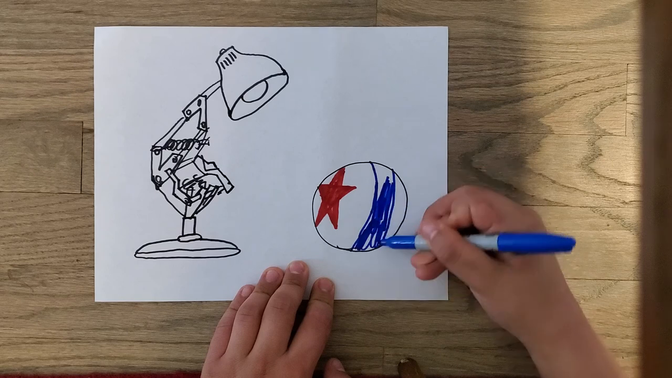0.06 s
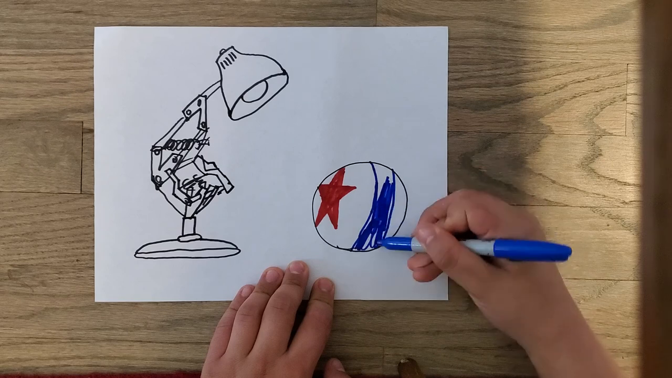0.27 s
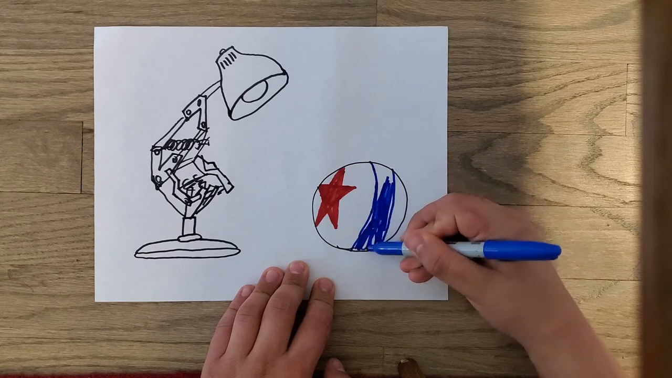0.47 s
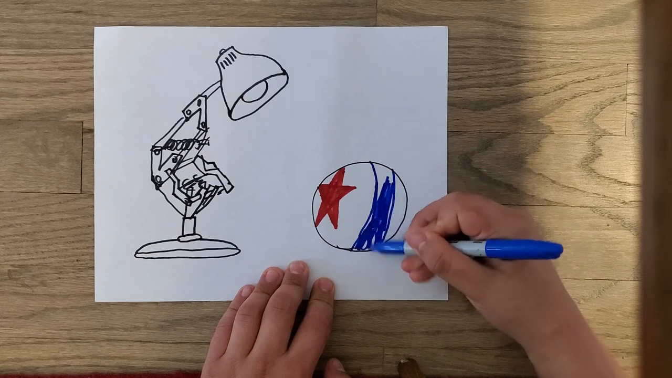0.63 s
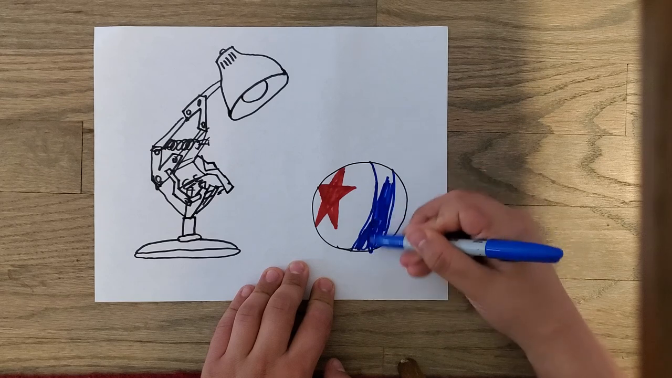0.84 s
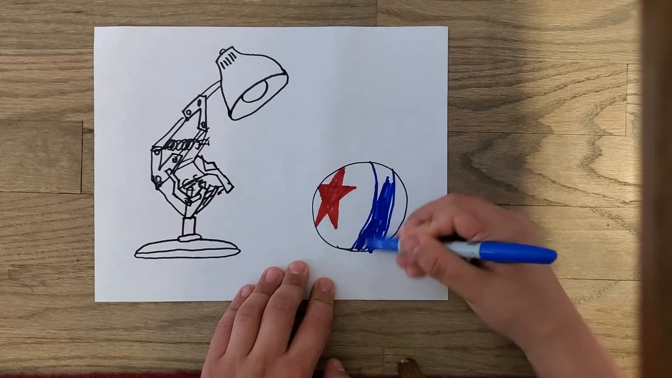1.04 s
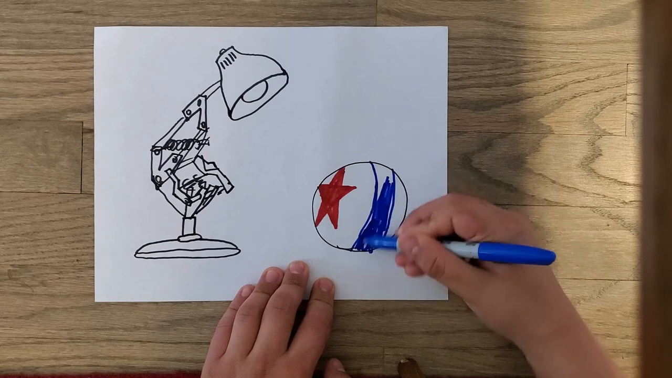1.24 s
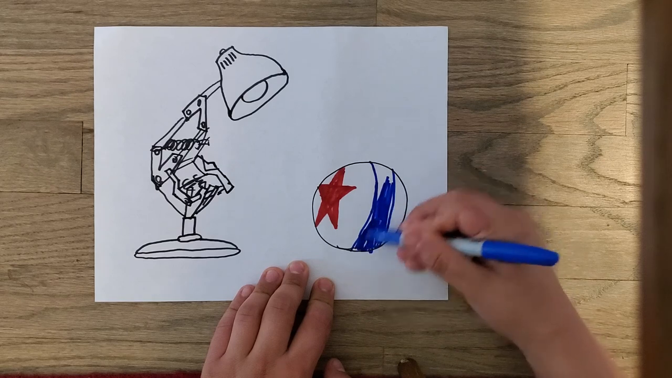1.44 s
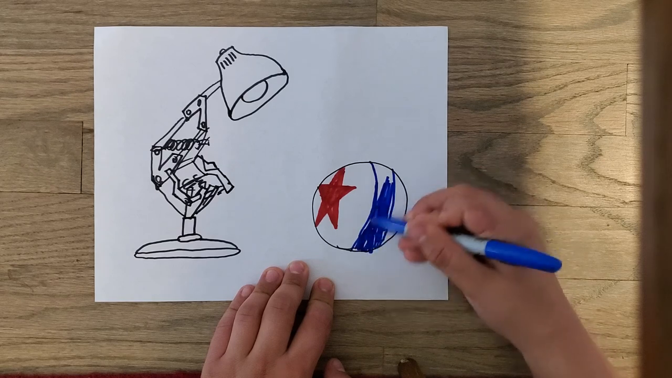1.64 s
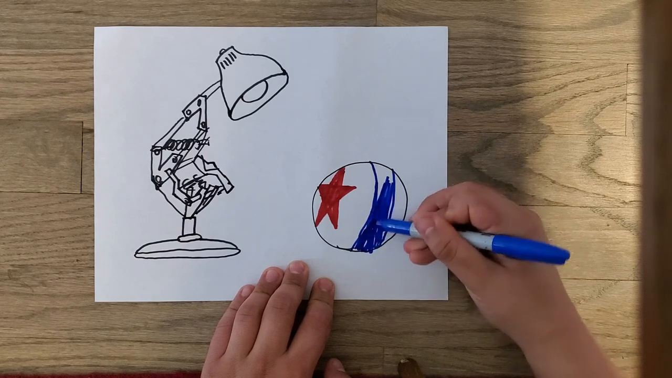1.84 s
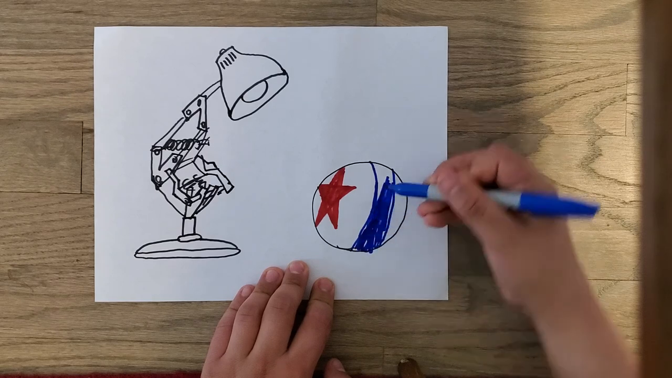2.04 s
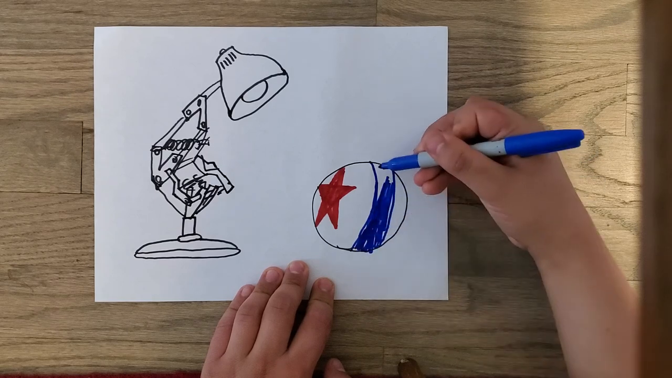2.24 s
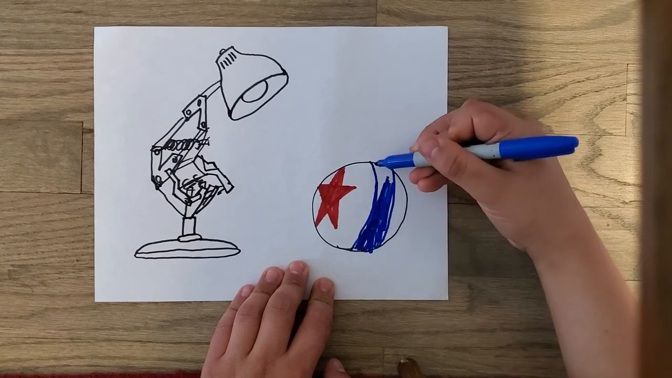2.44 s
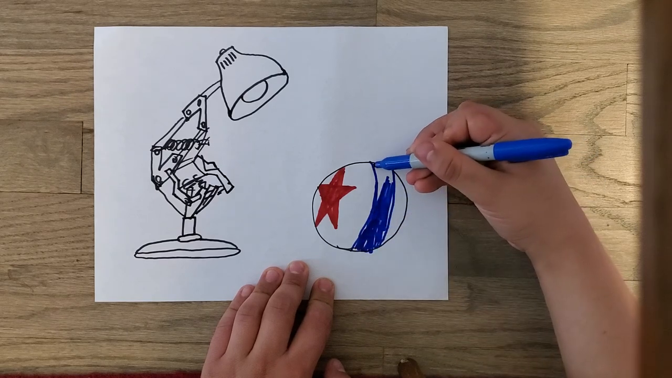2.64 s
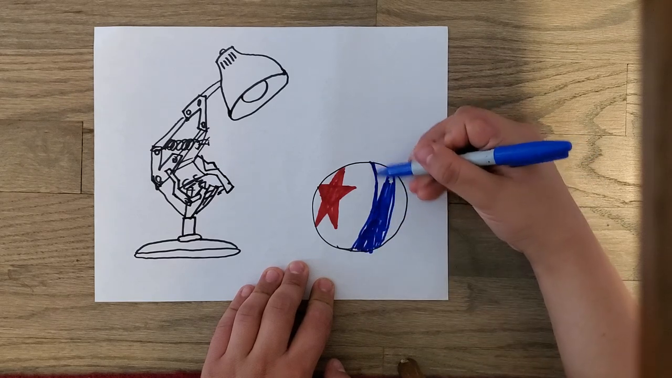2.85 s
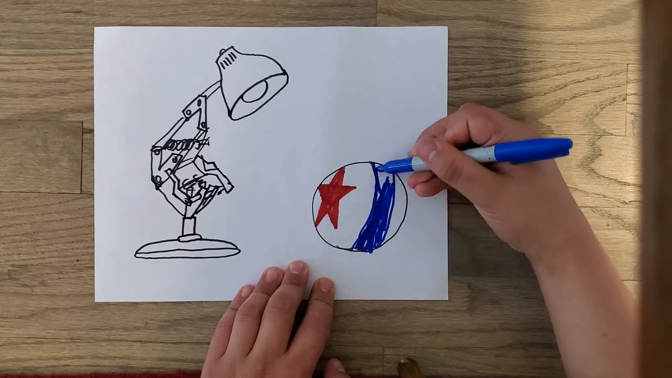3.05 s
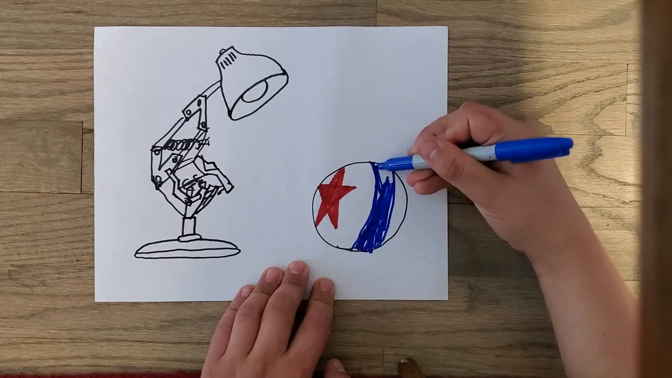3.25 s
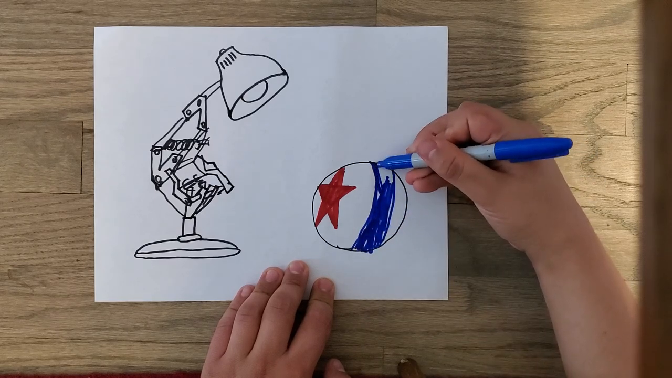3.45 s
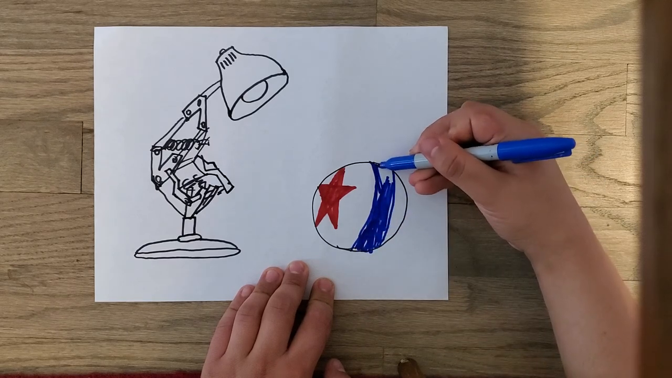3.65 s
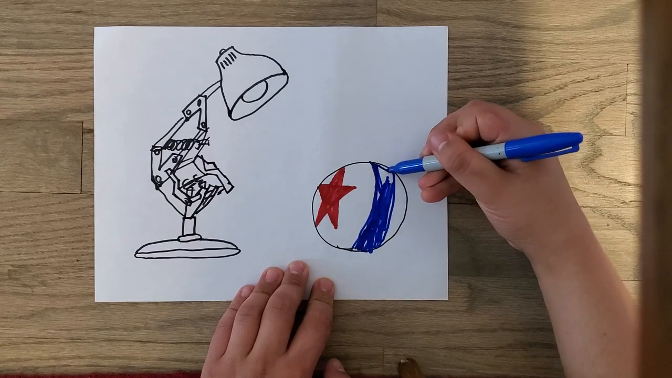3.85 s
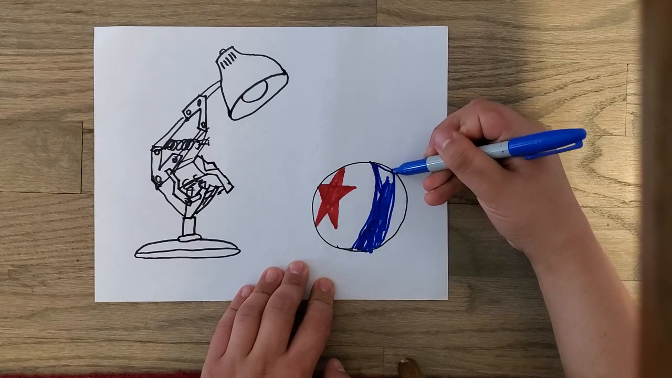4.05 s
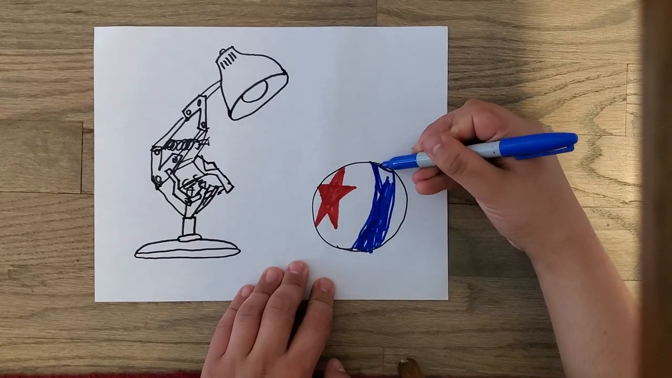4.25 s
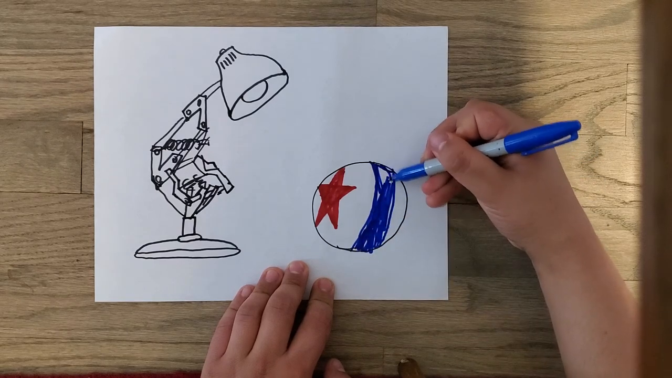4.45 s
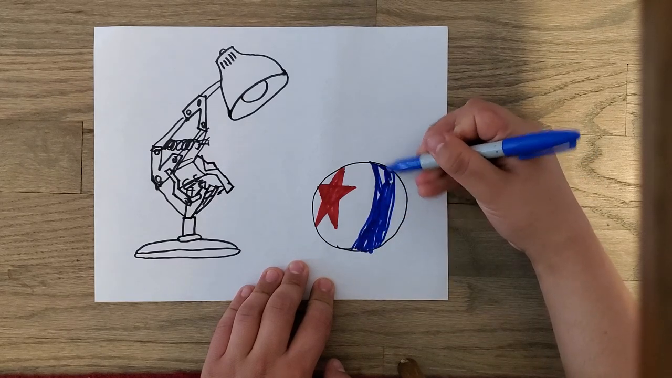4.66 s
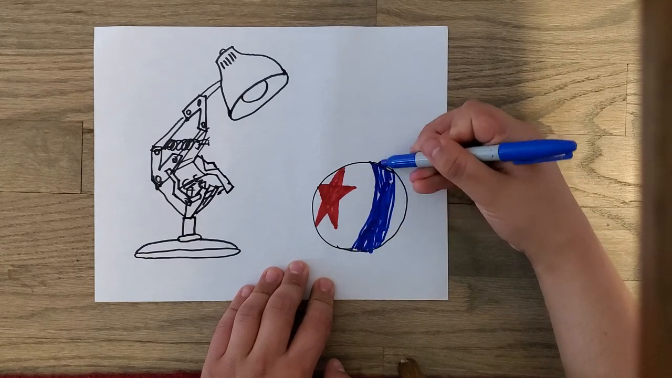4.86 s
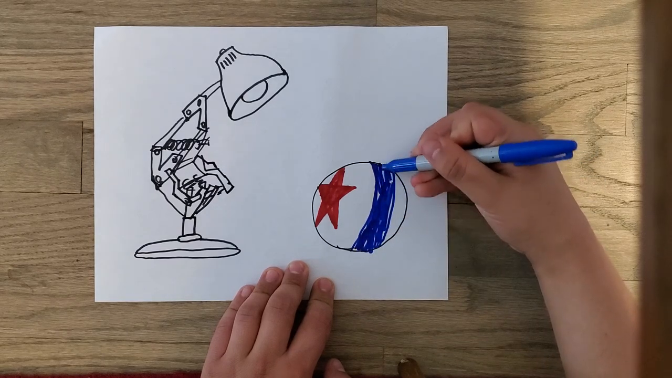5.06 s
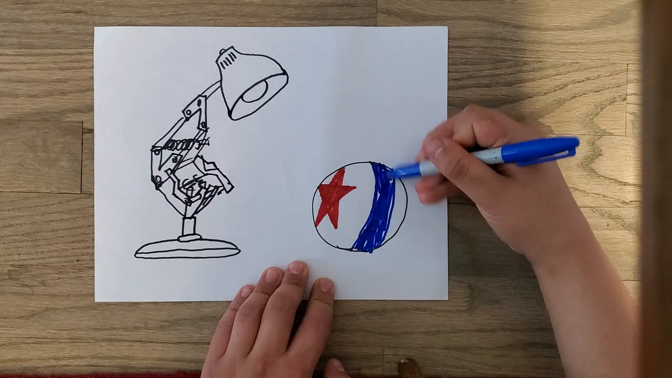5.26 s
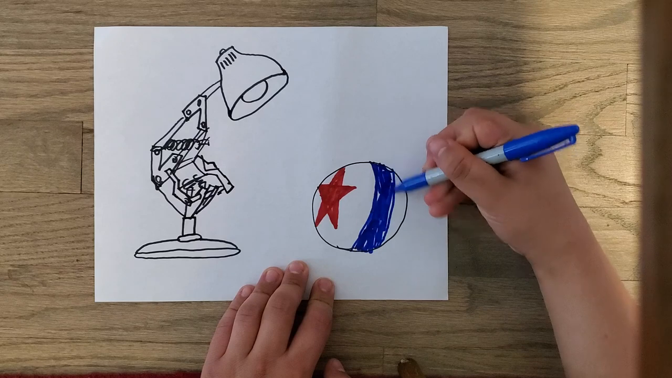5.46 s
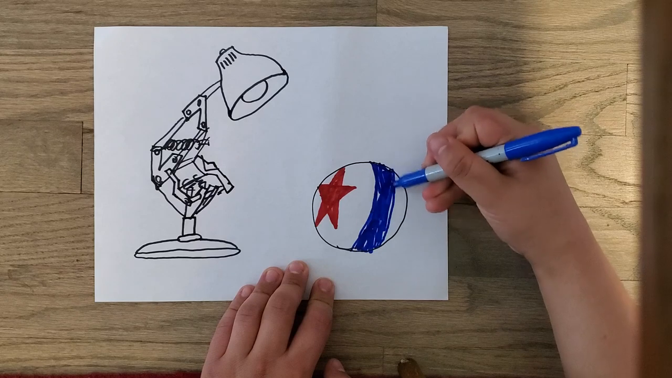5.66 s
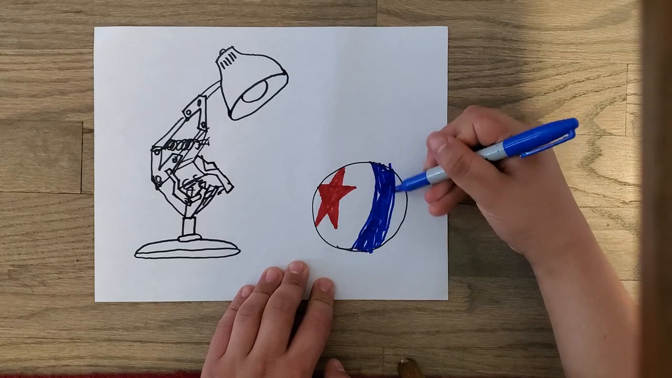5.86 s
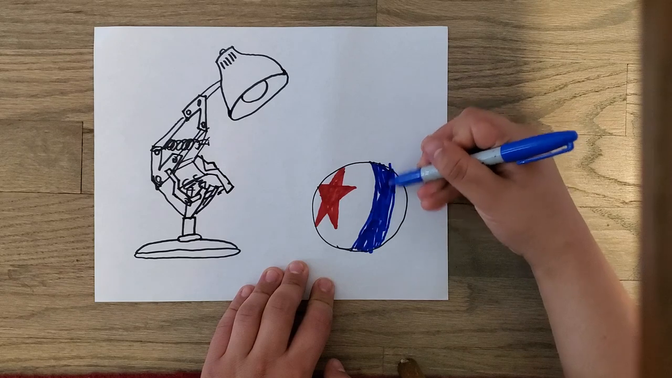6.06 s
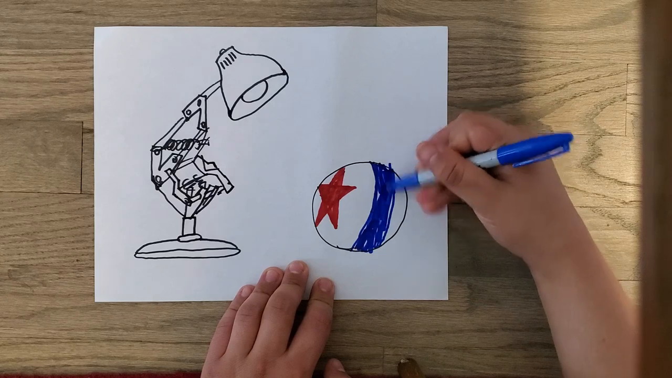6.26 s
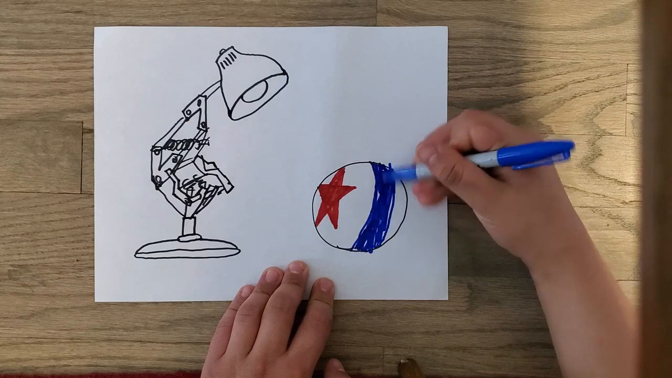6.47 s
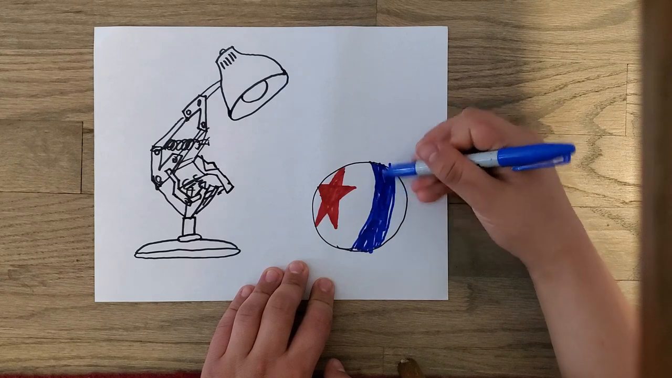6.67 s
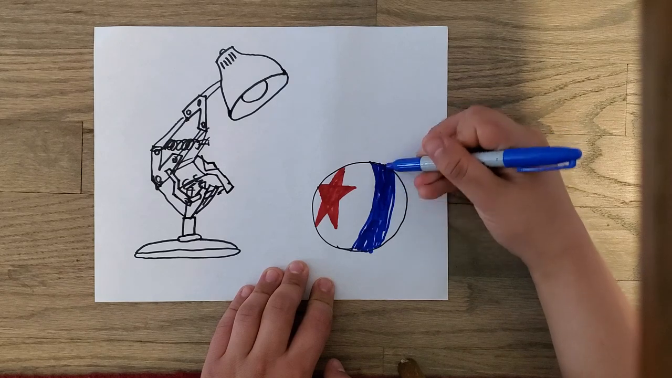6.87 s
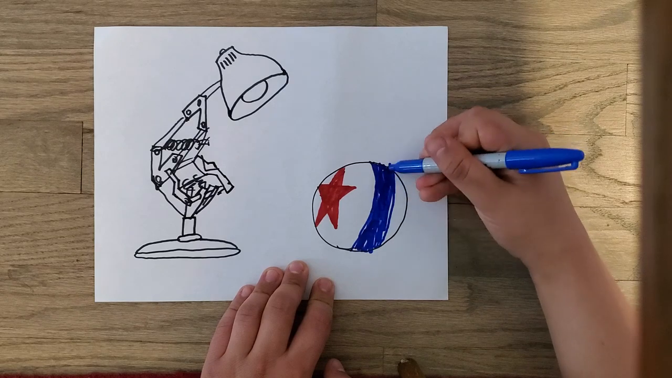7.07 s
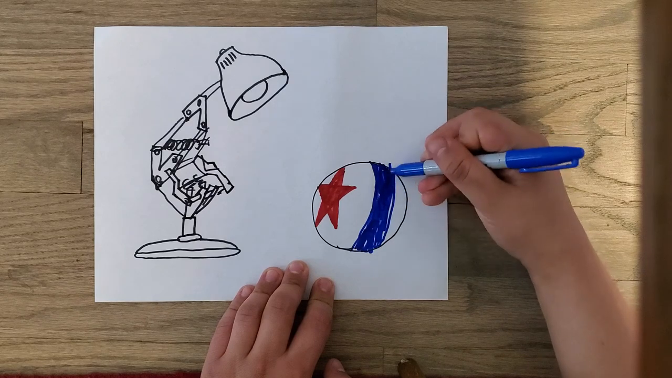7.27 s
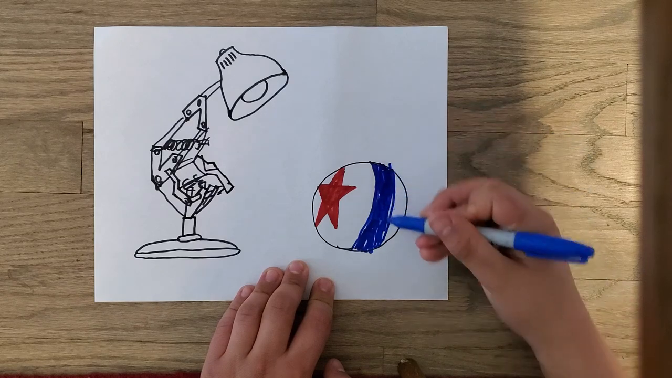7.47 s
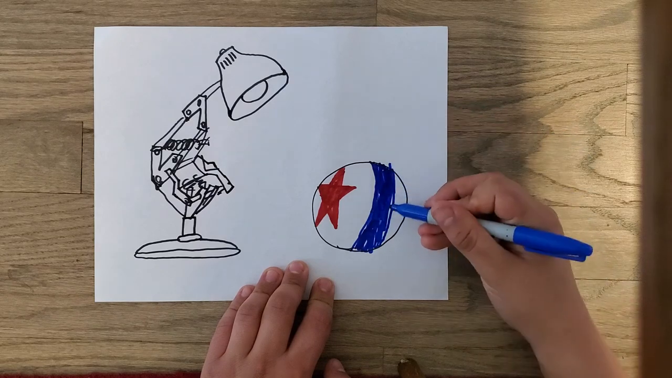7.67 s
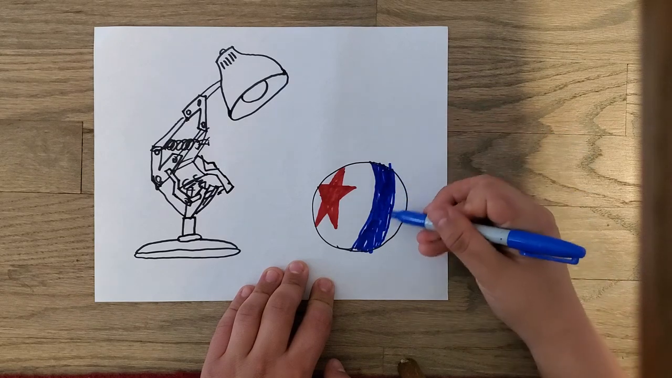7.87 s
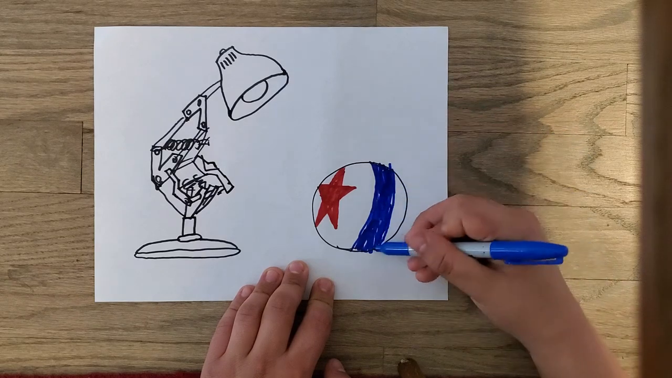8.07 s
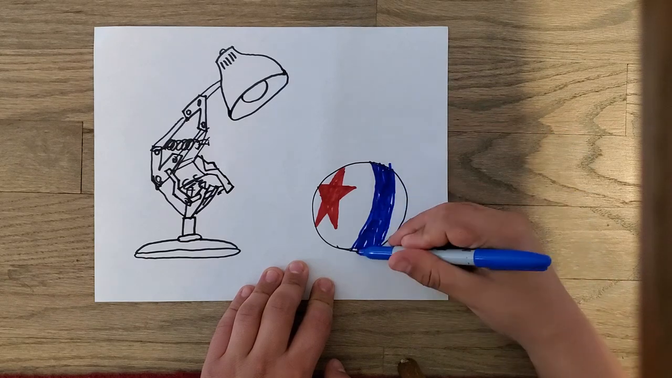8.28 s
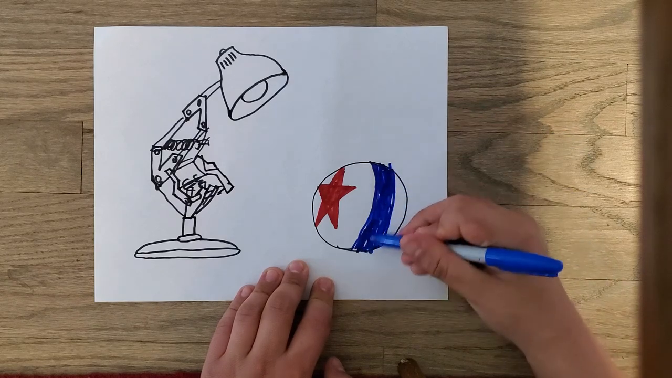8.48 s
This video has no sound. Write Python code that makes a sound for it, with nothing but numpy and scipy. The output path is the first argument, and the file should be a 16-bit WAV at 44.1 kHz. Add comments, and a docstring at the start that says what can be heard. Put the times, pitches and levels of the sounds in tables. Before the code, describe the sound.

A felt-tip marker scribbles quickly back and forth on paper, with short pauses, over a low indoor hum.

```python
"""In a small room, a felt-tip marker colours in a drawing on paper on wood, about ten strokes a second.
Sliding friction plucks the paper's fibres into a rasp and a hiss, close to the left microphone;
the right one hears mostly reverberation. The tip or the hand slides lightly, the wood rumbles,
the pen ticks on impact, its cap rings thinly, and stick-slip motion makes the felt squeak once.
Behind it all an appliance hums at twice the mains frequency."""
import sys
import numpy as np
from scipy import signal
from scipy.fft import rfft, irfft, next_fast_len
from scipy.io import wavfile
from scipy.ndimage import uniform_filter1d, map_coordinates

SR = 44100
rng = np.random.default_rng(int(sys.argv[2]) if len(sys.argv) > 2 else 0)


def log_audio(samples):
    """Write samples as a 16-bit WAV file to the path given in sys.argv[1]."""
    # one column per channel
    frames = np.atleast_2d(samples).T
    # limit to full scale, then quantise
    limited = np.clip(frames, -1, 1)
    pcm = np.round(limited * 32767).astype(np.int16)
    wavfile.write(sys.argv[1], SR, pcm)


N = 375291

# Tip friction on the far part of the drawing. Each row: frequency in Hz, relative density in dB.
FAR_TIP_SPECTRUM = [(300, -35), (1250, -27.5), (1750, -15), (2100, -20.5), (2600, -17.5), (3200, -11.5),
                    (3900, -17.5), (5600, -4.5), (6700, -5.5), (7400, -9.5), (8200, -4), (11300, 2.5),
                    (14000, 1), (15600, 0.5)]


def marker(speed, hiss_gain, rasp_gain, split_hz=7500):
    """Sliding friction: a faster tip plucks more fibres a second, giving a low rasp and a high hiss."""
    # Tip friction on the near part. Each row: frequency in Hz, relative density in dB.
    near_tip_spectrum = [(300, -27.5), (800, -29.5), (1150, -37.5), (1450, -20.5), (2050, -12.5),
                         (3000, -11), (4200, -13), (5400, -2.5), (6700, -3.5), (7500, -6), (10500, -3),
                         (13000, -2), (14400, -3.5), (15700, -4)]
    friction = patchy(fibres(2000 + 5000 * speed, snap_share=0.34, uneven_db=1.1), depth_db=2.5)
    sound = amp(-22 + 3.3 * wobble(14)) * rasp_gain * sheet(friction)
    far = on_far_part()
    for place, spectrum in ((~far, near_tip_spectrum), (far, FAR_TIP_SPECTRUM)):
        tip = coloured(friction, spectrum)
        rasp = filtered(tip, lambda hz: 1 / (1 + (hz / split_hz) ** 12))
        hiss = tip - rasp
        sound += place * (amp(0.65) * rasp_gain * unit(rasp) + amp(1.83) * hiss_gain * unit(hiss))
    return sound


def strokes(hiss_power=0.9, rasp_power=0.48, firm_db=-47.5):
    """Friction noise follows power laws: hiss grows faster with speed and firmness than rasp does."""
    # Each row: start in seconds, length in seconds, relative hiss level at top speed in dB.
    pen_strokes = [(-0.007, 0.084, -36.0), (0.094, 0.084, -35.5), (0.201, 0.092, -33.5),
                   (0.329, 0.049, -36.5), (0.378, 0.079, -40.5), (0.512, 0.071, -50), (0.614, 0.072, -46.5),
                   (0.7, 0.088, -42.0), (0.79, 0.105, -41.5), (0.918, 0.083, -43.5), (1.005, 0.087, -42.5),
                   (1.101, 0.103, -50.5), (1.209, 0.095, -46.5), (1.329, 0.09, -48), (1.425, 0.081, -43.5),
                   (1.507, 0.11, -43), (1.616, 0.091, -39.5), (1.719, 0.094, -42), (1.824, 0.075, -42),
                   (1.929, 0.082, -38.5), (2.031, 0.25, -64), (2.844, 0.12, -42.5), (2.987, 0.092, -40),
                   (3.1, 0.068, -40), (3.199, 0.075, -34.5), (3.297, 0.058, -49.0), (3.407, 0.066, -48),
                   (4.174, 0.044, -55), (4.338, 0.084, -46), (4.474, 0.052, -39), (4.533, 0.057, -40.5),
                   (4.63, 0.077, -37), (4.707, 0.072, -34), (4.802, 0.078, -35.0), (4.882, 0.088, -37.5),
                   (4.996, 0.066, -37), (5.079, 0.077, -39.0), (5.183, 0.066, -37.5), (5.259, 0.065, -42.0),
                   (5.35, 0.048, -46.5), (5.427, 0.064, -41.5), (5.505, 0.094, -38.5), (5.594, 0.086, -43),
                   (5.716, 0.085, -41.5), (5.798, 0.07, -37.0), (5.912, 0.064, -41), (5.989, 0.079, -44),
                   (6.097, 0.071, -38.5), (6.169, 0.088, -37.5), (6.275, 0.073, -38.5),
                   (6.352, 0.079, -36.5), (6.461, 0.063, -36.0), (6.54, 0.083, -35.5),
                   (6.648, 0.072, -36.5), (6.739, 0.07, -39), (6.829, 0.068, -35.0), (6.906, 0.075, -38.5),
                   (7.009, 0.074, -41.5), (7.11, 0.1, -42.0), (7.225, 0.083, -40.0), (7.391, 0.16, -67.5),
                   (7.871, 0.12, -42.5), (8.34, 0.11, -49), (8.459, 0.07, -43.5)]
    speed, hiss_gain, rasp_gain = np.zeros((3, N))
    for start, length, db in pen_strokes:
        on, pace = swing(start, length, top=0.61, bite=0.83)  # bite < 1: stuck felt lets go suddenly
        rasp_db = db - 6 - 0.51 * max(0, db - firm_db)
        speed[on] = pace
        hiss_gain[on] += amp(db) * pace ** hiss_power
        rasp_gain[on] += amp(rasp_db) * pace ** rasp_power
    return speed, hiss_gain, rasp_gain


def fibres(per_second, snap_share, uneven_db):
    """Shot noise: single fibres snap over a smooth rub, clumped by the paper's tooth."""
    chance = per_second / SR
    snaps = (rng.random(N) < chance) * rng.standard_normal(N) / np.sqrt(chance)
    rub = np.sqrt(snap_share) * snaps + np.sqrt(1 - snap_share) * rng.standard_normal(N)
    return unit(rub * amp(uneven_db * wobble(500)))


def sheet(friction):
    """Forced vibration: friction drives the damped modes of the paper on the wood."""
    # Each row: resonance frequency in Hz, bandwidth in Hz, relative level in dB.
    modes = [(335, 53, 4), (467, 60, -4), (780, 143, -2)]

    def response(f):
        return sum((-1) ** k * amp(db) * 1j * f * width / (hz * hz - f * f + 1j * f * width)
                   for k, (hz, width, db) in enumerate(modes))
    return unit(filtered(friction, response))


def lean(x, weight, body_hz=1710):
    """Mechanical coupling: weight joins the tip more firmly to the wood; lows grow, the hiss stays."""
    return x + (weight - 1) * filtered(x, lambda hz: 1 / (1 + (hz / body_hz) ** 6))


def brushing():
    """Light friction: the tip or the hand slides slowly over the sheet; the hand's edge scuffs dully."""
    # Each row: start in seconds, length in seconds, level at top speed in dB.
    slides = [(3.625, 0.22, -66.5), (3.797, 0.21, -77), (4.103, 0.078, -60), (4.15, 0.08, -52.5),
              (4.314, 0.095, -58), (7.812, 0.059, -62), (7.887, 0.2, -53), (7.998, 0.1, -44.5),
              (8.098, 0.11, -54), (8.196, 0.06, -47.5), (8.331, 0.13, -53.5)]
    # Each row: centre in seconds, half length in seconds, level in dB.
    scuffs = [(2.024, 0.026, -66.5), (3.463, 0.055, -72.5), (4.215, 0.05, -70), (4.446, 0.046, -70),
              (4.543, .045, -67), (7.49, 0.12, -69.5), (8.021, 0.041, -70), (8.492, 0.063, -65)]
    # Slides on each part, and the hand's edge. Each row: frequency in Hz, relative density in dB.
    far_spectrum = [(300, -28), (780, -0.5), (1100, -2), (1350, -4.5), (1700, 0.5), (2800, -11.5),
                    (3250, -6.5), (4100, -16), (5100, 3.5), (5700, 7.5), (7400, -13), (8300, -1.5),
                    (11000, -10), (15500, -7.5)]
    near_spectrum = [(300, -15.5), (800, -13), (1200, -18.5), (1900, -9.5), (2700, -11.5), (4400, -16.5),
                     (5600, -3), (6600, 0), (7200, -11), (7800, -7), (8800, -12), (10700, -12),
                     (12000, -17), (15500, -13)]
    edge_spectrum = [(150, -14), (300, -1.5), (480, 2), (780, 0.5), (1200, -17), (2500, -21), (6000, -49.5)]
    slide_gain = np.zeros(N)
    for start, length, db in slides:
        on, pace = swing(start, length, top=0.6, bite=0.6)
        slide_gain[on] += amp(db) * pace ** 1.15
    rub = patchy(fibres(4000, snap_share=0.16, uneven_db=0), depth_db=0.5)
    sliding = np.where(on_far_part(), coloured(rub, far_spectrum), coloured(rub, near_spectrum))
    scuff_gain = sum(amp(db) * np.exp(-((clock() - s) / half) ** 2) for s, half, db in scuffs)
    edge = coloured(rng.standard_normal(N), edge_spectrum)
    return slide_gain * sliding + scuff_gain * edge


def contacts(tick_t60=0.016, tap_t60=0.083):
    """Impact excitation: the plastic barrel ticks in three damped modes; the felt lands with a tap."""
    # Each row: start in seconds, level in dB, lowest mode in Hz.
    barrel_ticks = [(2.028, -47.5, 1530), (6.258, -44, 2140), (7.38, -56, 1620), (7.745, -54.5, 2170)]
    # The felt lands or turns round. Each row: start in seconds, relative level in dB.
    landings = [(0.339, -32), (0.629, -50), (0.712, -38), (0.931, -40.5), (2.85, -44), (3.002, -34.5),
                (3.106, -38), (3.411, -36), (4.477, -32), (4.634, -48), (5.267, -34), (5.434, -43),
                (5.808, -30), (6.748, -35), (6.92, -31)]
    t = np.arange(SR // 10) / SR
    ticks, taps = np.zeros((2, N))
    for s, db, hz in barrel_ticks:
        ring = sum(size * np.sin(2 * np.pi * ratio * hz * t)
                   for ratio, size in ((1, 1), (1.38, -1), (1.75, .45)))
        add(ticks, s, amp(db - 60 * t / tick_t60) * ring * (1 - np.exp(-t / 0.00021)))
    for s, db in landings:
        add(taps, s, amp(db - 60 * t / tap_t60) * rng.standard_normal(len(t)))
    return ticks + filtered(taps, lambda hz: amp(along(FAR_TIP_SPECTRUM, hz)))


def squeak():
    """Stick-slip: the felt squeaks and breaks up into a scrape."""
    # Each row: time in seconds, pitch in Hz, phase scatter in radians.
    glide = [(8.3, 1110, 0.55), (8.35, 1127, 0.6), (8.41, 1132, 0.55), (8.449, 1157, 1.4), (8.51, 1167, 2)]
    times, *columns = np.transpose(glide)
    pitch, scatter = (np.interp(clock(), times, column) for column in columns)
    envelope = amp(-58.5) * flare(8.28, attack_s=0.026, fade_db_per_s=43)
    return envelope * rough_tone(pitch, drift=0.00606, scatter_rad=scatter)


def cap_ring():
    """Resonance: the pen's cap rings thinly in a pause."""
    envelope = amp(-76) * flare(7.44, attack_s=0.024, fade_db_per_s=126)
    return envelope * rough_tone(2150, drift=0.0076, scatter_rad=0.97)


def wood(effort, bump_hz=92, bump_t60=0.04, smoothing_s=0.14, rest_db=-56.5):
    """Structure-borne sound: the wood rumbles more as the hand draws harder and thuds as it settles."""
    # Each row: start in seconds, level in dB.
    bumps = [(2.718, -35), (2.842, -40), (4.723, -37), (7.482, -38)]
    # The woody rub and the deep rumble. Each row: frequency in Hz, relative density in dB.
    drag_spectrum = [(150, -12.5), (280, -1), (350, 1), (480, -1.5), (560, -6.5), (750, -17), (1200, -16),
                     (3000, -47)]
    rumble_spectrum = [(22, -17.5), (45, 1.5), (65, 6.5), (100, 0.5), (140, -3), (210, 0.5), (270, -9.5),
                       (400, -33.5), (800, -64.5)]
    t = np.arange(SR // 5) / SR
    thuds = np.zeros(N)
    for s, db in bumps:
        envelope = amp(db - 60 * t / bump_t60) * (1 - np.exp(-t / 0.0054))
        add(thuds, s, envelope * np.sin(2 * np.pi * bump_hz * t))
    # the hand moves more smoothly than the tip, and grips unevenly
    motion = np.abs(uniform_filter1d(effort, int(smoothing_s * SR))) + amp(rest_db)
    grip = unit(motion ** 0.72 * amp(2.5 * wobble(16)))
    drag = amp(-69.5) * grip * diffuse(drag_spectrum)
    rumble = amp(-62.5) * unit(grip ** 0.5) * diffuse(rumble_spectrum)
    return thuds + drag + rumble


def room(x, right_delay_s=0.000171):
    """Direct and reverberant fields: the first favours the left, the second shifts as the pen wanders."""
    # Direct path to the right microphone, and reflections. Each row: frequency in Hz, gain in dB.
    right_gain = [(400, -1), (1200, -5), (1700, -17), (3000, -36.5), (4000, -30), (6000, -15.5),
                  (11000, -24), (15000, -15.5)]
    reverb_gain = [(400, 1.5), (2000, -3.5), (4000, -0.5), (6000, -9.5), (10000, -8), (15000, -12)]
    spot = 1.85 * wobble(3)
    reflections = echo(x * np.cos(spot)) + echo(x * np.sin(spot))
    reverb = filtered(reflections, lambda f: amp(along(reverb_gain, f)))
    right = filtered(x, lambda f: amp(along(right_gain, f)) * np.exp(-2j * np.pi * f * right_delay_s))
    return np.array([x, right]) + reverb


def echo(x, early_db=-3, early_s=0.0037):
    """Convolution with a room response: early reflections, then a tail that dies faster in the treble."""
    # Each row: frequency in Hz, reverberation time in seconds.
    t60 = [(300, 0.48), (3000, 0.4), (8000, 0.44), (15000, 0.27)]
    hz, t, noise = signal.stft(rng.standard_normal((2, SR // 2)), SR, nperseg=256)
    decay = amp(-60 * t / along(t60, hz)[:, None]) + amp(early_db) * np.exp(-t / early_s)
    tail = signal.istft(noise * decay, SR, nperseg=256)[1]
    tail = np.pad(tail / np.linalg.norm(tail[0]), ((0, 0), (SR // 500, 0)))  # arrives 2 ms late
    return signal.fftconvolve(x[None], tail, axes=1)[:, :N]


def appliance(hum_hz=120):
    """Forced vibration at twice the mains frequency gives a wavering hum, joined by weak motor tones."""
    # Each row: time in seconds, rms level in dB.
    hum_levels = [(0.0, -54.5), (0.16, -52.5), (0.47, -52.5), (0.52, -62), (0.68, -55), (1.21, -54),
                  (2.58, -61), (3.1, -53), (3.62, -60.5), (4.83, -56), (5.37, -57.5), (5.44, -55.5),
                  (6.49, -56.5), (6.96, -52.5), (7.6, -58), (7.98, -50.5), (8.21, -57), (8.5, -52.5)]
    # Each row: frequency in Hz, rms level in dB.
    motor_tones = [(37.5, -78), (240, -74), (261.3, -76.5), (287.5, -75)]
    t = clock()
    hum_db = np.interp(t, *np.transpose(hum_levels)) + 0.06 * wobble(7)
    hum = amp(hum_db) * np.sin(2 * np.pi * hum_hz * t + .08 * wobble(7.5))
    motor = sum(amp(db + 0.45 * wobble(2.6)) * np.sin(2 * np.pi * hz * t + 0.25 * wobble(1.2))
                for hz, db in motor_tones)
    return np.sqrt(2) * (hum + motor)


def air():
    """Ambient noise: the room's air forms a faint, steady diffuse field."""
    # Each row: frequency in Hz, relative density in dB.
    air_spectrum = [(22, -20.5), (45, -9), (105, 3.5), (150, -7), (270, -9.5), (470, -19.5), (650, -22.5),
                    (1000, -33.5), (1700, -33), (2250, -27.5), (4000, -35.5), (6200, -36), (8000, -45),
                    (15000, -35)]
    return amp(-66.5) * diffuse(air_spectrum)


def diffuse(spectrum):
    """A diffuse field at rms 1: the two sides are alike in the bass and unrelated in the treble."""
    # Each row: frequency in Hz, left-right coherence as a ratio.
    coherence = [(40, 0.81), (120, 0.84), (250, 0.57), (400, 0.65), (600, 0), (8000, 0.046)]

    def response(hz):
        angle = np.arccos(along(coherence, hz)) / 2
        return amp(along(spectrum, hz)) * [np.cos(angle), np.sin(angle)]
    mid, side = filtered(rng.standard_normal((2, N)), response)
    return unit(np.array([mid + side, mid - side]))


def rough_tone(hz, drift, scatter_rad):
    """Random modulation: a tone wavers in frequency, phase and amplitude."""
    phase = 2 * np.pi * np.cumsum(hz * (1 + drift * wobble(25))) / SR
    return unit(np.sin(phase + scatter_rad * wobble(300)) * amp(2 * wobble(120)))


def patchy(x, depth_db):
    """Spectral modulation: smooth random gains shift the colour from spot to spot."""
    spectra = signal.stft(x, nperseg=512)[2]
    field = uniform_filter1d(rng.standard_normal(spectra.shape), size=3, axis=0)
    field = uniform_filter1d(field, size=14, axis=1)
    return unit(signal.istft(spectra * amp(depth_db * unit(field)), nperseg=512)[1][:N])


def swing(start, length, top, bite):
    """Samples and speed (0-1) of a movement that accelerates for the share top of its length, then slows."""
    on = np.arange(max(0, int(start * SR)), min(N, int((start + length) * SR)))
    done = (on / SR - start) / length
    pace = np.sin(np.pi / 2 * np.interp(done, [0, top, 1], [0, 1, 0]))
    return on, pace ** np.where(done < top, bite, 1)


def flare(start, attack_s, fade_db_per_s):
    """An envelope of quadratic growth and exponential decay."""
    t = clock() - start
    return np.clip(t / attack_s, 0, 1) ** 2 * amp(-fade_db_per_s * np.maximum(t - attack_s, 0))


def on_far_part(from_s=2.6, to_s=7.7):
    """True while the pen works on the far part of the drawing."""
    return (clock() > from_s) & (clock() < to_s)


def wobble(rate):
    """A smooth random curve, rate knots a second."""
    knots = rng.standard_normal(int(N * rate / SR) + 4)
    return map_coordinates(knots, [np.arange(N) * rate / SR])


def filtered(x, response):
    """Linear filtering: the spectrum of x times a frequency response."""
    size = next_fast_len(N + 8192)
    return irfft(rfft(x, size) * response(np.fft.rfftfreq(size, 1 / SR)), size)[..., :N]


def coloured(x, spectrum):
    """x shaped by a spectrum, at rms 1."""
    return unit(filtered(x, lambda hz: amp(along(spectrum, hz))))


def along(points, hz):
    """Interpolate (Hz, value) points on a log axis."""
    f, v = np.transpose(points)
    return np.interp(np.log(hz + 1), np.log(f + 1), v)


def add(track, s, sound):
    """Superpose a sound on a track at s seconds."""
    part = track[round(s * SR):][:len(sound)]
    part += sound[:len(part)]


def amp(db):
    """Decibels to gain."""
    return 10 ** (np.asarray(db) / 20)


def unit(x):
    """Scale to rms 1."""
    return x / np.sqrt(np.mean(x ** 2) + 1e-20)


def clock():
    """The time of every sample in seconds."""
    return np.arange(N) / SR


def scene():
    """Superposition of all sources; the squeak and the ring sound equally on both sides, with some echo."""
    # How heavily the hand leans on the pen. Each row: time in seconds, gain of the lows in dB.
    leaning = [(0, 3.5), (0.6, -0.5), (1.25, -4), (1.55, 1.5), (2.6, 0), (3.05, 1.5), (3.5, 3), (4.5, 3),
               (5.05, -7.5), (5.35, -4), (5.6, 0.5), (6.3, 0), (6.85, 2), (8.5, -2)]
    weight = amp(np.interp(clock(), *np.transpose(leaning)))
    speed, hiss_gain, rasp_gain = strokes()
    tones = squeak() + cap_ring()
    rubbing = lean(marker(speed, hiss_gain, rasp_gain), weight) + brushing() + contacts()
    drawing = room(rubbing) + tones + amp(-0.5) * echo(tones)
    return drawing + wood(effort=weight * hiss_gain) + appliance() + air()


def record(dry, top_hz=15850):
    """Band limiting: an ideal low-pass filter removes the highest treble."""
    return filtered(dry, lambda hz: hz < top_hz)


dry = scene()
out = record(dry)
log_audio(out)
```